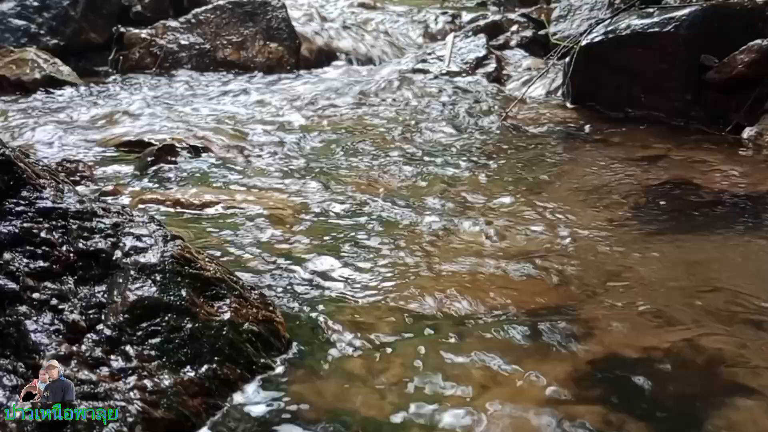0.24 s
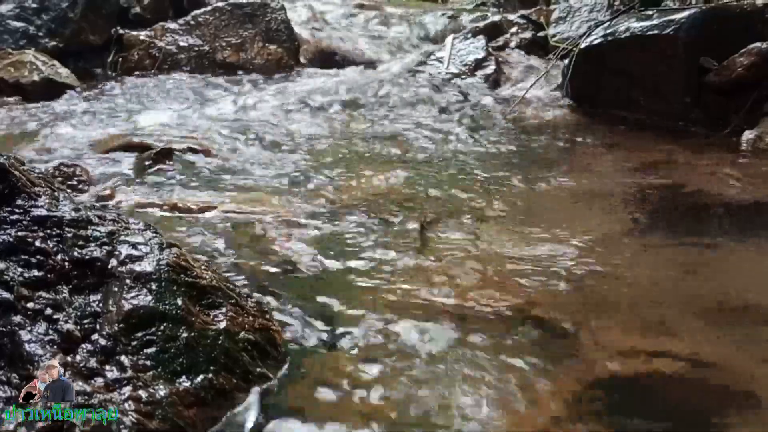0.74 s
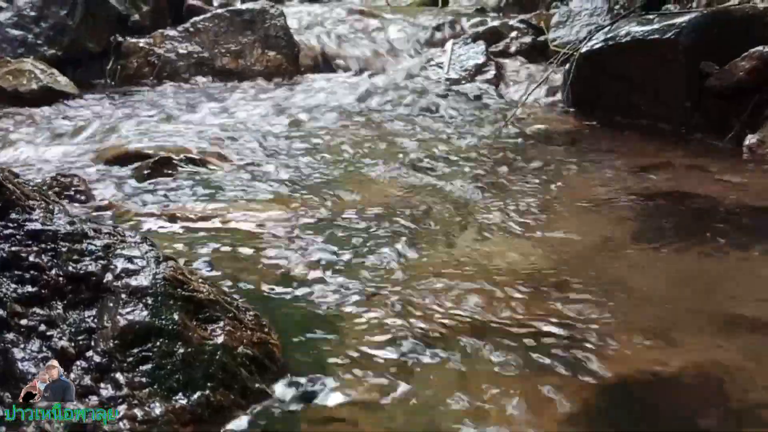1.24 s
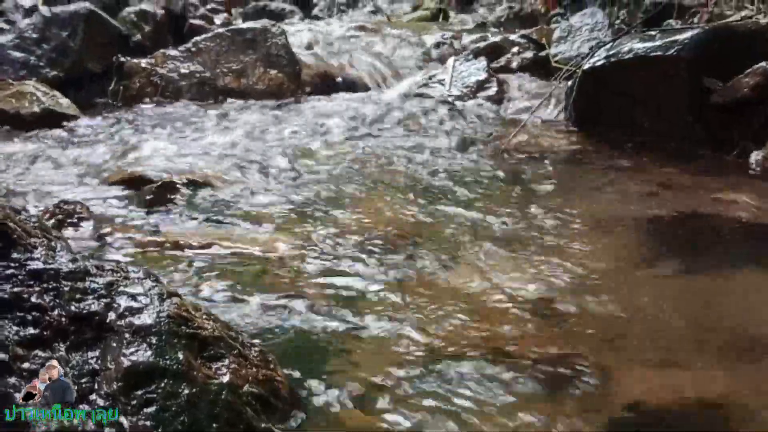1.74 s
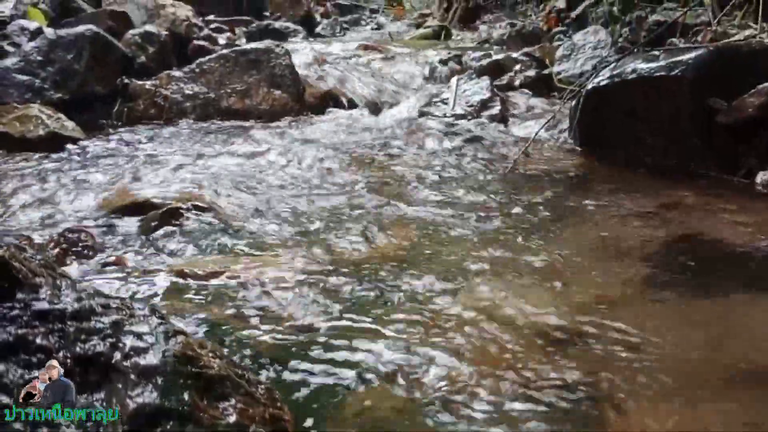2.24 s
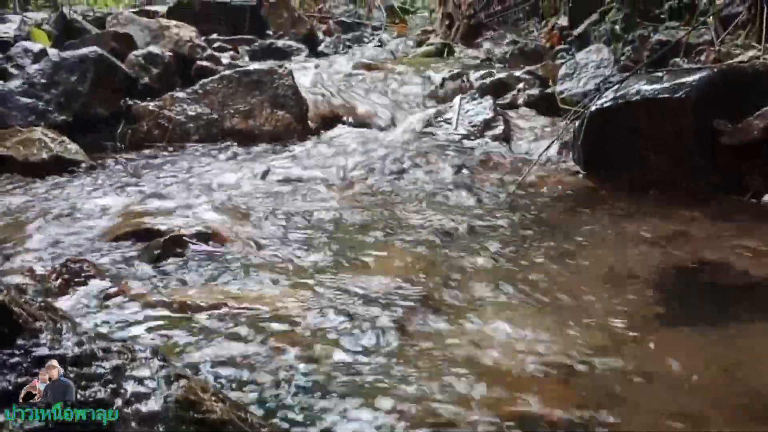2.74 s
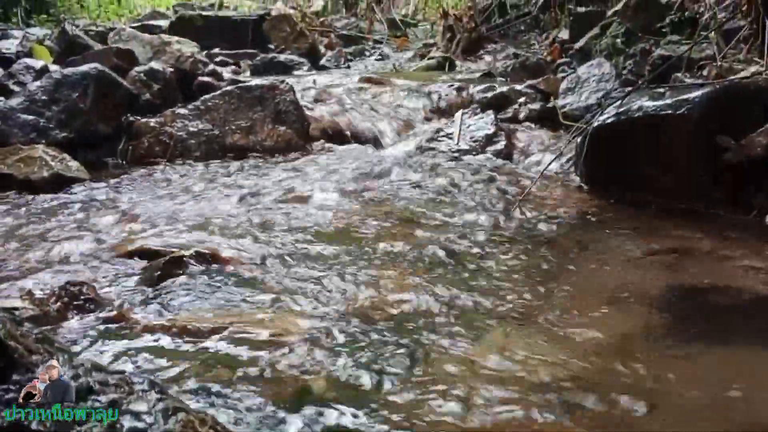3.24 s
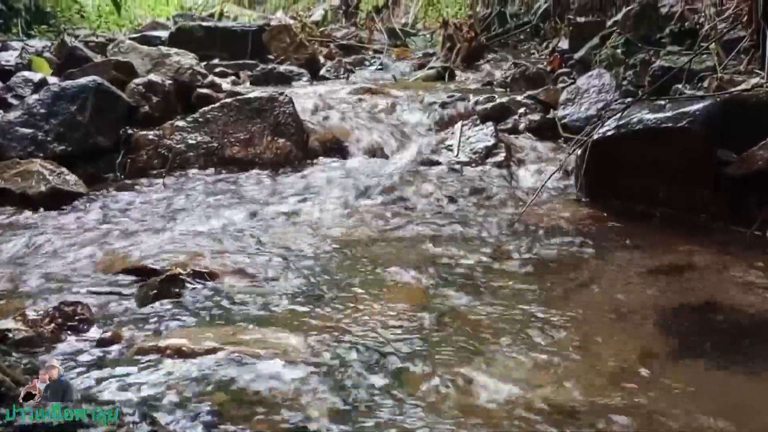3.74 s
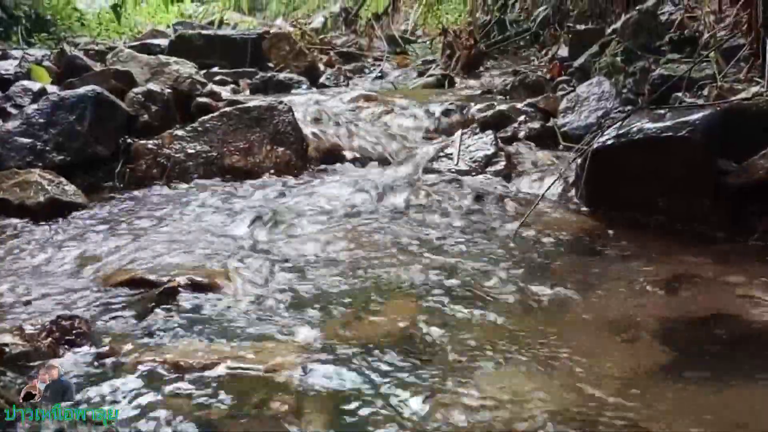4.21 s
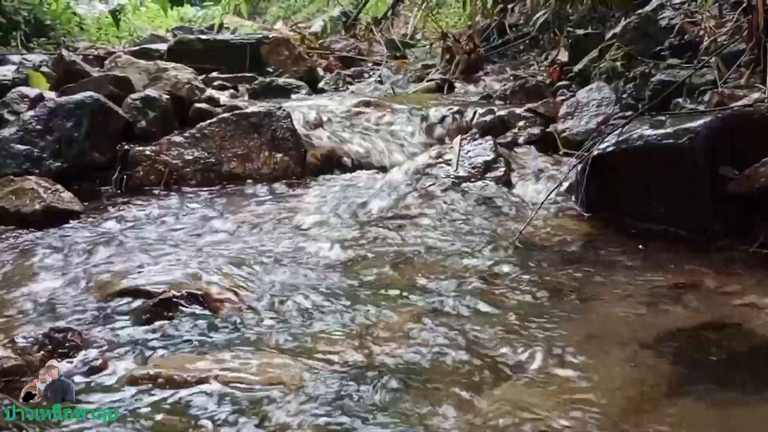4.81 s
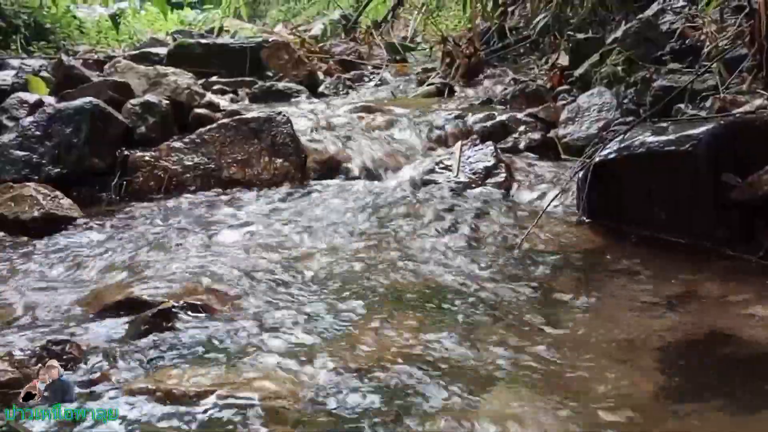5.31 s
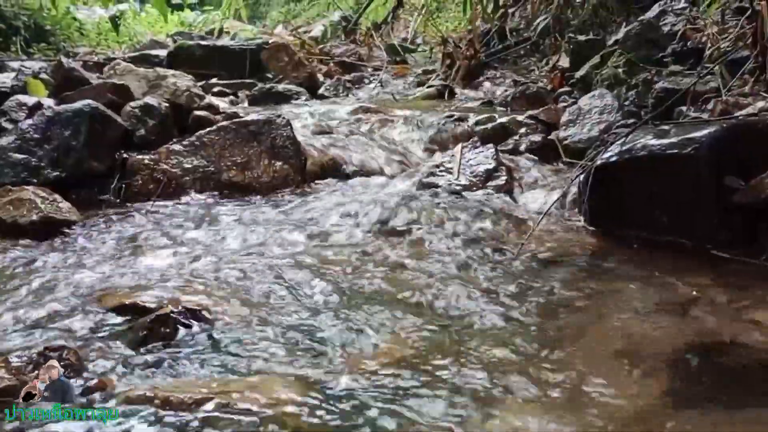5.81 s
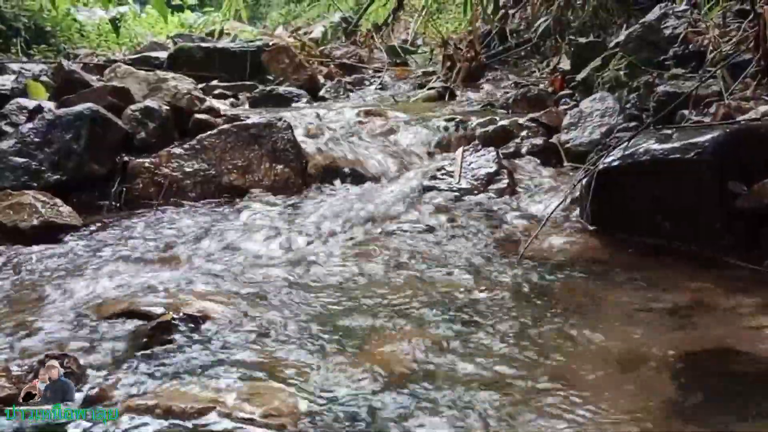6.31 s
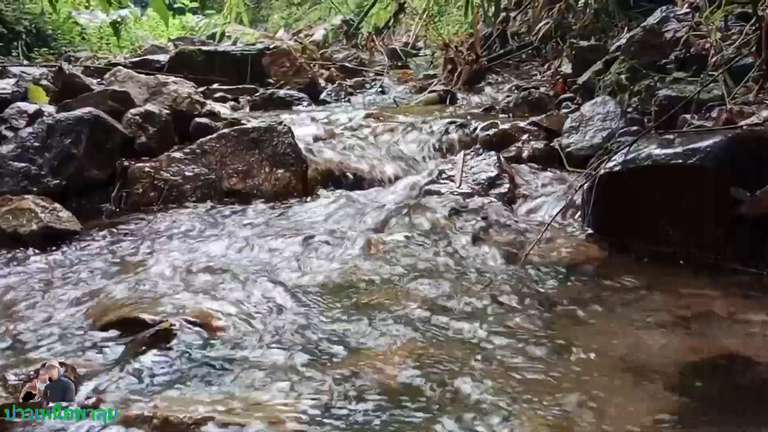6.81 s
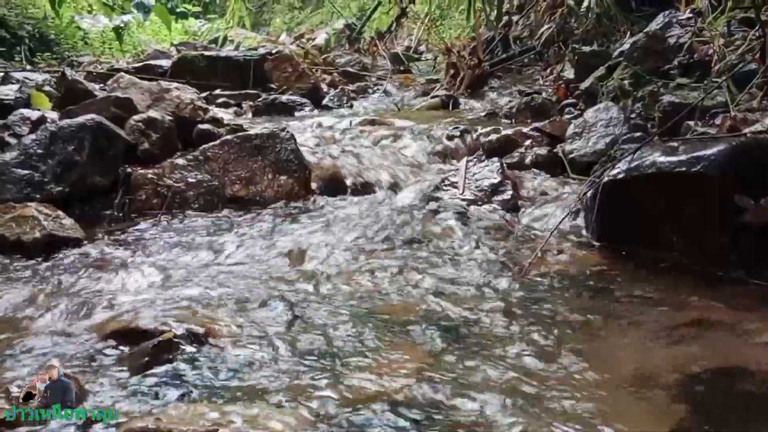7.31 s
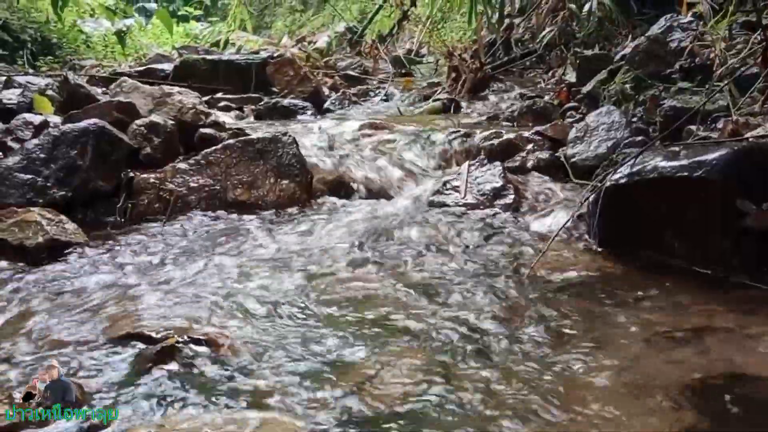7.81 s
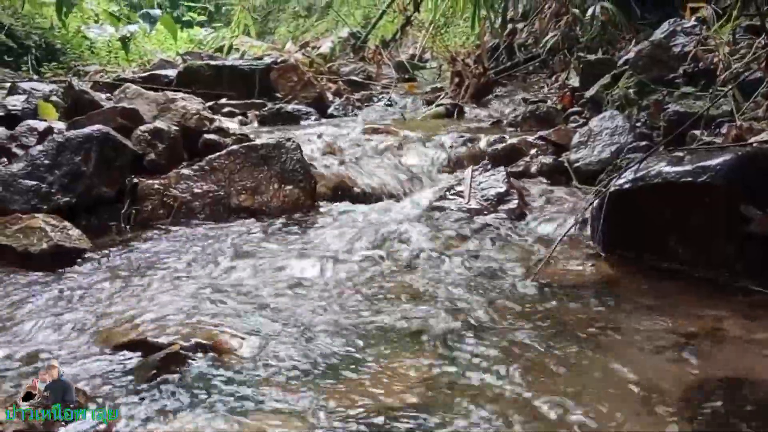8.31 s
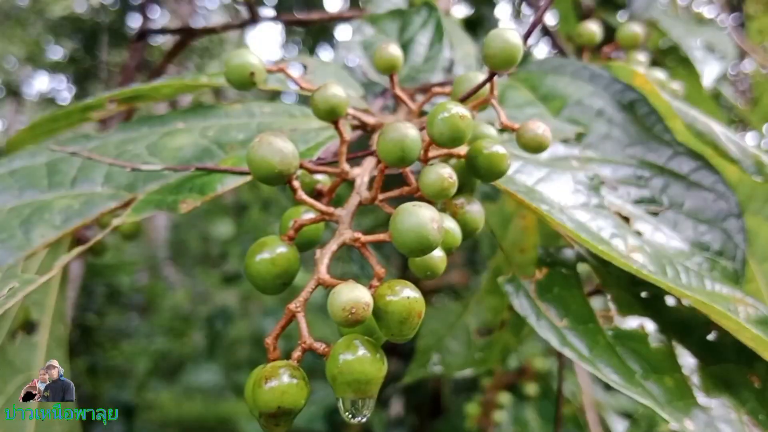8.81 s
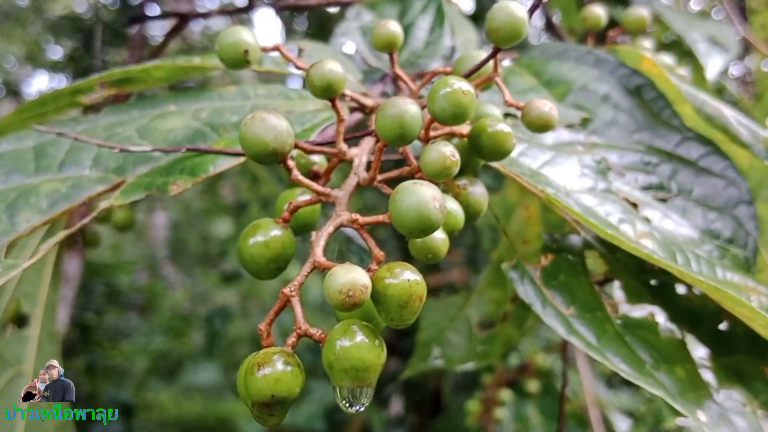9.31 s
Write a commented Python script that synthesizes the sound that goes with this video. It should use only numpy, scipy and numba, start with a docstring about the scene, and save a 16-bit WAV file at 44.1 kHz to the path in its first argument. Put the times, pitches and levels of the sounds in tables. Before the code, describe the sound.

A very short spell of quiet forest air with thin cicada and cricket tones opens the scene. After a tiny gap, a shallow stream swells in quickly, close to the microphone: dense bubbling, low gurgles, bright spray and plops over rocks. It runs continuously for about eight seconds, then cuts off to an even fainter forest with cicadas and one soft low bump.

```python
"""A shallow forest stream runs over rocks close by: decaying, rising sines make its bubbles and air pockets,
and coloured noise makes its wash, spray and splashes; wavelets set the bubbles off in bunches.
Before and after it come two short spells of quiet forest: faint air noise, a narrow noise band of cicadas,
amplitude-modulated tones of trilling crickets, far wavering notes and one soft bump of decaying noise."""
import sys
import numpy as np
from scipy import signal
from scipy.fft import rfft, irfft, next_fast_len
from scipy.io import wavfile
from scipy.ndimage import uniform_filter1d, minimum_filter1d
from numba import njit

SR = 44100
rng = np.random.default_rng(int(sys.argv[2]) if len(sys.argv) > 2 else 0)


def bounce(signal):
    """Save signal as a 16-bit WAV file at the path given by the first command-line argument."""
    frames = np.transpose(np.atleast_2d(signal))
    limited = np.clip(frames, -1, 1)
    pcm = np.round(limited * 32767).astype(np.int16)
    wavfile.write(sys.argv[1], SR, pcm)


N = 421155


def from_db(db):
    """Level to amplitude: 20 dB is a factor of ten."""
    return 10 ** (np.asarray(db) / 20)


def rms_one(x):
    """Normalization: scales the signal to unit root-mean-square amplitude."""
    return x / np.sqrt(np.mean(x ** 2) + 1e-20)


def gains(rows):
    """Level envelopes: each dB column becomes a gain per sample, silent outside the rows."""
    s, *columns = np.transpose(rows)
    t = np.arange(N) / SR
    return [from_db(np.interp(t, s, db, left=-np.inf, right=-np.inf)) for db in columns]


def drift(per_s):
    """Band-shaped random modulation: smooth, of unit spread, swinging about per_s times a second."""
    ratio = np.arange(N // 2 + 1) * SR / N / per_s
    shape = np.sqrt(ratio) / (1 + ratio ** 2)
    return rms_one(irfft(rfft(rng.standard_normal(N)) * shape, N))


def humps(rows, half_s):
    """Superposition of Gaussian bells in time, one for each row (time_s, height)."""
    t = np.arange(0, N, 64) / SR  # a coarse grid is enough for smooth bells
    bells = sum(height * np.exp(-((t - s) / half_s) ** 2) for s, height in rows)
    return np.interp(np.arange(N) / SR, t, bells)


def coloured(x, spectrum):
    """Minimum-phase (causal) filtering to the given spectrum, by way of the cepstrum; rms 1."""
    size = next_fast_len(N + SR // 2, True)
    hz, db = np.transpose(spectrum)
    grid = np.maximum(np.arange(size // 2 + 1) * SR / size, 1)
    magnitude = from_db(np.interp(np.log(grid), np.log(hz), db))
    cepstrum = irfft(np.log(magnitude), size)
    response = np.exp(rfft(2 * cepstrum[:size // 2], size))  # folding the cepstrum makes it causal
    return rms_one(irfft(rfft(x, size) * response, size)[:N])


def noise(spectrum):
    """Filtered noise: steady Gaussian noise with the given spectrum; rms 1."""
    return coloured(rng.standard_normal(N), spectrum)


def band(x, low_hz, high_hz):
    """Band-pass filtering with gentle Butterworth slopes."""
    return signal.sosfilt(signal.butter(2, [low_hz, high_hz], "band", fs=SR, output="sos"), x)


def strikes(rows):
    """Impulsive excitation: one click for each row (time_s, level_db, ..)."""
    s, db = np.transpose(rows)[:2]
    return np.bincount((s * SR).astype(int), from_db(db), N)


@njit
def ring_bubbles(start, height, hz, cycles, rise, swell):
    """Damped oscillators: each swells over `swell` cycles, dies 60 dB in `cycles`, glides up by share `rise`."""
    out = np.zeros(N)
    for k in range(len(start)):
        length = int(cycles[k] * SR / hz[k]) + 2
        fade = np.exp(-np.log(1000) / length)
        opening = np.exp(-hz[k] / (swell * SR))
        level, closed, phase = height[k], 1.0, 0.0
        for i in range(min(length, N - start[k])):
            out[start[k] + i] += level * (1 - closed) * np.sin(phase)
            phase += 2 * np.pi * hz[k] / SR * (1 + rise[k] * i / length)
            level *= fade
            closed *= opening
    return out


def swarm(per_s, low_hz, high_hz, cycles, rise, swell, size_db, surge):
    """Random births of damped bubbles, more in each surge; few are big, power is even over pitch; rms 1."""
    start = np.flatnonzero(rng.random(N) < per_s * surge / surge.mean() / SR)
    pitch, size, life, glide, sign = rng.random((len(start), 5)).T
    hz = low_hz + (high_hz - low_hz) * pitch
    loudness = from_db(size_db * np.minimum(-np.log(1 - size), 3.5))
    # high bubbles ring for less time, so they start stronger
    height = loudness * np.sqrt(hz) * np.sign(sign - .5)
    return rms_one(ring_bubbles(start, height, hz, cycles * (.5 + life), rise * glide, swell))


def single_bubbles(rows, cycles, rise, swell):
    """Damped oscillators at set times; each starts a little under its pitch, low ones die in fewer cycles."""
    s, db, hz = np.transpose(rows)
    life = cycles * (hz / np.median(hz)) ** 0.25 * rng.uniform(1.0, 1.92, len(s))
    start = (s * SR).astype(np.int64)
    return ring_bubbles(start, from_db(db), hz * (1 - rise / 6), life, np.full(len(s), rise), swell)


def splats(hits, t60):
    """Exponential energy decay: each hit on the surface is a burst of hiss that starts at once and dies."""
    power = signal.lfilter([1], [1, -from_db(-120 / (t60 * SR))], hits ** 2 + 1e-18)
    return np.sqrt(power) * rng.standard_normal(N)


def spatter(per_s, size_db, t60, surge):
    """Random impacts: droplets of uneven size fall back on the water in hiss bursts; rms 1."""
    lands = rng.random(N) < per_s * surge / surge.mean() / SR
    sizes = from_db(size_db * np.minimum(rng.exponential(1, N), 4))
    return rms_one(splats(lands * sizes, t60))


def among_rocks(x, echo_db, t60):
    """Diffuse scattering: stones and banks add a short dense decaying tail behind each sound."""
    t = np.arange(SR // 4) / SR
    tail = rng.standard_normal(len(t)) * from_db(-60 * t / t60) * (t > .002)
    return x + from_db(echo_db) * signal.fftconvolve(x, tail / np.linalg.norm(tail))[:N]


def crickets(count):
    """Amplitude modulation: a near cricket and farther ones trill out of step, pulses overlapping; rms 1."""
    centre_hz, spread_hz, pulse_hz = 5180, 30, 85
    t, out = np.arange(N) / SR, 0
    for k, (detune, pace) in enumerate(rng.uniform(-1, 1, (count, 2))):
        wing = np.sin(2 * np.pi * (centre_hz + spread_hz * detune) * t + .25 * drift(15.0))
        pulse_phase = 2 * np.pi * pulse_hz * (1 + 0.23 * pace) * t + .9 * drift(9)
        out = out + from_db(-10 * k) * wing * (1 + 0.48 * np.sin(pulse_phase))
    return rms_one(out)


def far_notes():
    """Frequency modulation: each faint note is a brief wavering tone in a Gaussian envelope."""
    # faint notes far off in the forest: time_s at the peak, peak_db, pitch_hz before the waver
    note_rows = [(0.17, -65, 1440), (9.09, -82, 890)]
    half_s, waver_share = 0.025, 0.029
    t = np.arange(N) / SR
    turns_s = np.cumsum(1 + waver_share * drift(70)) / SR
    out = np.zeros(N)
    for s, db, hz in note_rows:
        out += from_db(db) * np.exp(-((t - s) / half_s) ** 2) * np.sin(2 * np.pi * hz * turns_s)
    return out


def soft_bump():
    """Transient envelope: low noise with a linear attack and an exponential decay."""
    # colour of the bump: frequency_hz, density_db (relative, per Hz)
    bump_spectrum = [(60, -37), (160, 2), (250, -7), (340, -6), (510, -6), (680, -26), (2000, -42)]
    start_s, peak_db, attack_s, t60_s = 9.19, -60.5, .018, 0.25
    age = np.arange(N) / SR - start_s
    decay_db = peak_db - 60 * np.maximum(age - attack_s, 0) / t60_s
    return np.clip(age / attack_s, 0, 1) * from_db(decay_db) * noise(bump_spectrum)


def forest():
    """Superposed steady sources: air with an uneven low rustle, cicadas and crickets; notes and a bump join."""
    # levels of the quiet forest: time_s, air_db, cicadas_db, crickets_db
    forest_levels = [(0, -64, -61, -61), (.25, -64, -62, -63), (.292, -69, -69, -69),
                     (.3, -130, -130, -130), (8.8, -130, -130, -130), (8.86, -97, -88, -105),
                     (8.92, -86, -73, -100), (9.04, -82, -69, -81), (9.55, -82, -69.5, -76)]
    # forest air in the first and in the second spot: frequency_hz, density_db (relative, per Hz)
    air_first = [(40, -11), (140, -5.5), (900, -15.5), (1450, -8), (2200, -4.5), (4000, -23), (6000, -26),
                 (7800, -4.5), (9200, -18), (10000, -10.5), (11000, -19), (15500, -25)]
    air_second = [(40, 1), (170, 5), (600, -6), (1100, -5.5), (1600, 1.5), (4000, -12.5), (7300, -13.5),
                  (7900, 0), (10500, -3), (11600, -15.5), (15500, -24)]
    # cicada chorus: frequency_hz, density_db (relative, per Hz)
    cicada_spectrum = [(5500, -44), (6000, -30.5), (6300, -18), (6450, -18), (6700, -2.5), (7060, -3),
                       (7200, -21.5), (7500, -36)]
    air_gain, cicada_gain, cricket_gain = gains(forest_levels)
    t = np.arange(N) / SR
    air = np.where(t < t[-1] / 2, noise(air_first), noise(air_second))
    air = air + (from_db(2.5 * drift(14)) - 1) * band(air, 120, 700)
    insects = cicada_gain * noise(cicada_spectrum) + cricket_gain * crickets(count=3)
    return air_gain * air + insects + far_notes() + soft_bump()


def gulps(length_s, wobble):
    """Shape-modulated resonance: a trapped air pocket swells and fades, wobbling in pitch and strength."""
    # fullest gulps of air trapped under the rocks: time_s at the fullest, level_db (relative),
    # pitch_hz before the wobble
    gulp_rows = [(0.593, -43, 152), (1.09, -32.5, 367), (1.5, -45, 256), (1.58, -35, 347),
                 (1.812, -46, 206), (1.86, -35, 344), (2.336, -46, 156), (2.641, -34, 375),
                 (2.99, -44, 152), (3.084, -41, 228), (3.21, -35, 321), (3.661, -49, 155), (4.43, -37, 362),
                 (4.839, -46.5, 226), (5.381, -42, 284), (5.535, -36.5, 254), (5.665, -34.5, 348),
                 (5.7, -45, 136), (6.217, -41.5, 234), (6.435, -41, 216), (6.572, -45, 234),
                 (7.04, -38.5, 205), (8.338, -40, 195)]
    out, swell, shape = np.zeros(N), np.hanning(int(length_s * SR)), drift(12.3)
    for s, db, hz in gulp_rows:
        start = int((s - length_s / 2) * SR)
        span = slice(start, start + len(swell))
        phase = 2 * np.pi * np.cumsum(hz * (1 + wobble * shape[span])) / SR
        out[span] += from_db(db) * swell * np.sin(phase)
    return out * from_db(2 * drift(30))


def near_splashes():
    """Impulse and resonance: plops, slaps on stones, low clicks, drops that tap and leave a ringing bubble."""
    # loudest single bubbles: start_s, level_db (relative), pitch_hz (nominal)
    plop_rows = [(0.8, -15.5, 772), (0.82, -6.5, 830), (0.822, -4, 605), (0.903, -14, 2078),
                 (0.961, -9.5, 843), (1.018, -10.5, 830), (1.053, -6, 2100), (1.08, -7.5, 436),
                 (1.131, -6.5, 1280), (1.235, -1.5, 1195), (1.256, -3, 537), (1.287, -6, 1310),
                 (1.309, -2.5, 786), (1.418, -8.5, 1200), (1.533, 4, 1207), (1.728, -5.5, 1220),
                 (1.776, -10, 1250), (1.85, -11.5, 767), (1.994, -8.5, 1220), (2.218, -8.5, 460),
                 (2.393, -13, 590), (2.411, -4.5, 1480), (2.427, -9.5, 471), (2.656, -7, 1220),
                 (2.772, -10, 1800), (2.779, -5, 1506), (3.168, -0.5, 1320), (3.189, -5, 1580),
                 (3.212, -7, 620), (3.217, -7, 1070), (3.671, -2, 1200), (3.725, -10, 1370),
                 (3.766, -8, 510), (3.911, -12, 846), (3.915, -9.5, 508), (4.064, -6, 800),
                 (4.218, -6, 526), (4.41, -9, 1680), (4.44, -9.5, 2300), (4.535, -11.5, 584),
                 (4.677, -11, 567), (4.713, -5.5, 598), (4.771, -14, 1230), (4.788, -7.5, 513),
                 (4.817, -4.5, 1203), (4.853, -10, 626), (5.128, -6.5, 1920), (5.35, -2.5, 1270),
                 (5.475, -5, 793), (5.656, -1, 1585), (5.696, -9, 1030), (5.779, -8, 1044),
                 (5.893, -4, 550), (5.912, -12.5, 440), (6.034, -11, 530), (6.238, -3.5, 1900),
                 (6.325, -10, 1210), (7.401, -8, 1940), (7.43, -10, 591), (7.733, -7, 575),
                 (7.808, -8, 1580), (7.872, -8.5, 1920), (7.938, -10.5, 2077), (8.167, -4, 595),
                 (8.217, -7, 1090), (8.325, -5, 1980), (8.44, -1.5, 1610), (8.466, -4, 618),
                 (8.472, -6, 844), (8.595, 3, 1197), (8.616, -10, 2000)]
    # loudest drops landing close by: start_s, level_db (relative), pitch_hz (nominal)
    drop_rows = [(0.7528, -17.5, 8100), (1.3155, -11.5, 8540), (1.8503, -10, 8000), (2.5367, -16, 8200),
                 (3.073, -16.5, 8870), (3.5015, -15, 8500), (4.592, -16.5, 6440), (4.8524, -8.5, 8360),
                 (4.9193, -15, 8330), (5.7339, -12, 8650), (5.8921, -16, 8700), (6.0343, -16, 9600),
                 (6.4852, -13.5, 7650), (7.037, -16.5, 5510)]
    # wavelets slapping a stone: start_s, level_db (relative)
    slap_rows = [(0.8, -31), (1.277, -27), (1.637, -29.5), (1.774, -32), (2.769, -28.5), (3.212, -26.5),
                 (4.106, -24.5), (4.591, -29.5), (4.851, -26), (5.654, -31), (5.78, -20), (5.798, -28),
                 (5.893, -18.5), (7.037, -23.5), (7.401, -23)]
    # short low broadband clicks: start_s, level_db (relative)
    low_click_rows = [(1.257, -5), (3.214, -6), (5.656, -15), (7.039, -16)]
    plops = band(single_bubbles(plop_rows, cycles=22.2, rise=0.16, swell=2.37), 380, 6000)
    # the surface breaks with each plop
    bursts = band(splats(strikes(plop_rows), t60=0.037), 430, 2600)
    slap = splats(strikes(slap_rows), t60=0.025)
    slaps = from_db(13) * band(band(slap, 380, 3700), 380, 3700)  # twice for steeper edges
    low_clicks = band(strikes(low_click_rows), 25, 260)  # band-passed impulses
    taps = band(splats(strikes(drop_rows), t60=0.028), 2900, 12000)
    drops = single_bubbles(drop_rows, cycles=46, rise=0.0594, swell=3.2) + from_db(-12.0) * taps
    return from_db(1.2) * plops + from_db(-16) * bursts + slaps + low_clicks + from_db(1.0) * drops


def spray_layer(wavelets, wash, splashing):
    """High-frequency bubble resonance and impact noise: fizz, splashing, ticks and pings; rms 1."""
    # colour of the spray: frequency_hz, density_db (relative, per Hz)
    spray_spectrum = [(3000, -35.5), (5400, -6.5), (6050, -9.5), (6800, -0.5), (7900, 2), (8750, 2.5),
                      (9350, -7), (9850, -3.5), (11400, -10), (12000, -11), (13100, -7), (13850, -15.5),
                      (15300, -11.5), (17000, -22.5)]
    fizz = swarm(2400, 4610, 15800, cycles=170, rise=0.11, swell=0.15, size_db=3.5,
                 surge=from_db(1.6 * wavelets))
    # the nearest droplets tick sharply, and a few trap a tiny bubble that pings
    ticks = spatter(50, size_db=3.9, t60=.015, surge=from_db(2 * wavelets + 3 * drift(7)))
    pings = swarm(45, 6500, 10000, cycles=130, rise=0.073, swell=.5, size_db=5.5,
                  surge=from_db(2 * wavelets))
    droplets = from_db(2.5) * splashing + from_db(0.5) * ticks + from_db(-10.0) * pings
    return coloured(fizz + wash + droplets, spray_spectrum)


def babble_layer(wavelets, wash, splashing):
    """Small-bubble resonance over wash and splashing; rms 1 before one band is modulated in level."""
    # colour of the babble: frequency_hz, density_db (relative, per Hz)
    babble_spectrum = [(500, -39), (900, -9), (1070, -2), (1240, -1.5), (1380, -5.5), (1530, -3.5),
                       (1740, -7), (1920, -4.5), (2250, -9), (2390, -7.5), (2900, -15.5), (3650, -25.5),
                       (4400, -27.5), (6000, -54.5)]
    small = swarm(1600, 901.8, 4630, cycles=95.4, rise=0.22, swell=0.016, size_db=0.96,
                  surge=from_db(2.4 * wavelets))
    babble = coloured(small + from_db(-1) * wash + from_db(-8) * splashing, babble_spectrum)
    # random slow level modulation of the 3.1 to 5.2 kHz band
    return babble + (from_db(2.8 * drift(5.0)) - 1) * band(babble, 3100, 5200)


def gurgle_layer(wavelets, wash):
    """Large-bubble resonance: big and deep bubbles and slow pockets; rms 1 before the low levels are shaped."""
    # colour of the gurgle: frequency_hz, density_db (relative, per Hz)
    gurgle_spectrum = [(30, -54.5), (100, -30), (145, -26), (175, -27), (230, -26.5), (285, -31.5),
                       (350, -16), (390, -18), (450, -5.5), (605, 4), (700, -1), (800, 4.5), (930, -2.5),
                       (1300, -26.5)]
    # lowest gurgling: time_s, level_db over its usual level
    low_levels = [(0.6, 2), (3.7, 0.5), (4.2, -4.5), (4.7, -1), (5.6, 2.5), (6.3, -0.5), (7.1, 1),
                  (7.85, -4.5), (8.3, 1)]
    big = swarm(420, 330, 1005.0, cycles=42.0, rise=0.33, swell=0.8, size_db=2.5,
                surge=from_db(2.2 * wavelets + 1.2 * drift(12)))
    # the deepest bubbles murmur in patches of their own
    deep = swarm(130, 110, 340, cycles=23.4, rise=.25, swell=1.2, size_db=3.5,
                 surge=from_db(1.5 * wavelets + 4 * drift(6)))
    # slow air pockets sing round, rising notes
    pockets = swarm(30, 140, 521, cycles=34, rise=0.2, swell=11, size_db=1.5, surge=from_db(wavelets))
    bubbles = big + from_db(-2.0) * deep + from_db(-12) * pockets
    gurgle = coloured(bubbles + from_db(-4) * wash, gurgle_spectrum)
    low_gain = from_db(np.interp(np.arange(N) / SR, *np.transpose(low_levels)))
    return gurgle + (low_gain - 1) * band(gurgle, 70, 550)


def stream():
    """Superposition of gurgle, babble and spray, all modulated by the same wavelets, current, waves and lulls."""
    # strength of the current: time_s, level_db over its usual level
    current_rows = [(0.6, 0.5), (0.9, 4.5), (1.3, 2.5), (1.55, 1.15), (2.35, 0.8), (3.4, 0), (4.8, 0.5),
                    (6.4, 0.5), (6.9, -0.5), (7.8, 2), (8.6, 0.6)]
    # bigger waves pour over the stones: time_s at the crest, gurgle_db added, babble_db added
    wave_rows = [(0.59, 1.5, 1.5), (0.68, 3.5, 1.5), (1.28, 3, -1.5), (1.8, 3.5, 3), (2.38, 4.5, 3),
                 (3.2, 4, 0), (3.8, 5, -1), (4.24, 3, -0.5), (4.79, 8.5, 2), (5.65, 2.5, 2.5),
                 (5.91, 6, -1.5), (6.36, 1.5, 2), (6.46, 3, 3), (6.91, 1, 3.5), (7.42, 1.5, -0.5),
                 (8.32, 4.5, 1), (8.47, 7, 1)]
    # the water slackens between waves: time_s at the trough, loss_db
    lull_rows = [(0.785, 0), (1.39, 0.5), (1.61, 3), (2.52, 4.5), (3.258, 2.5), (3.62, 1), (4.16, 2.5),
                 (4.57, 3.5), (5.29, 2.5), (5.45, 1.5), (5.83, 3), (6.08, 3.5), (6.56, 2), (6.84, 2),
                 (6.995, 2.5), (8.11, -1)]
    wave_half_s, lull_half_s = 0.038, 0.022
    t = np.arange(N) / SR
    wavelets = drift(24)
    wash = from_db(-9) * rng.standard_normal(N)  # smooth wash of the rapids
    splashing = spatter(150, size_db=1.0, t60=0.19, surge=from_db(3.1 * wavelets))

    current_db = np.interp(t, *np.transpose(current_rows))
    lulls_db = humps(lull_rows, lull_half_s)
    gurgle_waves_db = humps([(s, db) for s, db, _ in wave_rows], wave_half_s)
    babble_waves_db = humps([(s, db) for s, _, db in wave_rows], wave_half_s)
    gurgle_swing_db = gurgle_waves_db - 1.3 * lulls_db  # lulls weigh more on the gurgle
    babble_swing_db = babble_waves_db - lulls_db
    # the gurgling slowly recedes, by 0.49 dB per second
    gurgle_db = -28.5 + 0.82 * current_db - 0.49 * t + gurgle_swing_db
    babble_db = -25.5 + current_db + babble_swing_db
    spray_db = -36 + 0.74 * current_db + .4 * babble_swing_db

    gurgle = from_db(gurgle_db) * gurgle_layer(wavelets, wash)
    babble = from_db(babble_db) * babble_layer(wavelets, wash, splashing)
    spray = from_db(spray_db) * spray_layer(wavelets, wash, splashing)
    return gurgle + babble + spray


def stream_fade():
    """Amplitude envelope: the stream fades in quickly; at the end it dips and is cut off."""
    start_s, end_s = 0.415, 8.69
    fade_in_s, fade_out_s, fade_out_db = 0.047, 0.047, 12.5  # fade_in_s is a time constant
    t = np.arange(N) / SR
    opening = (1 - np.exp(-np.maximum(t - start_s, 0) / fade_in_s)) ** 2
    closing = from_db(-fade_out_db * np.clip(1 - (end_s - t) / fade_out_s, 0, 1))
    return opening * closing * np.clip((end_s - t) / .005, 0, 1)


def scene():
    """Superposition: the open stream, with the quiet forest before and after."""
    close = among_rocks(near_splashes(), echo_db=-11.0, t60=0.28)
    water = stream() + close + from_db(0.5) * gulps(length_s=0.11, wobble=0.079)
    return (water * stream_fade() + forest())[None]


def limited(x, ceiling):
    """Peak limiting: a fast, smoothed gain ducks the few peaks that pass the ceiling."""
    size = SR // 200
    needed = ceiling / np.maximum(np.abs(x), ceiling)
    return x * uniform_filter1d(minimum_filter1d(needed, size), size)


def record(dry):
    """Band rejection: the microphone has a treble notch, and the notch's depth wavers; peaks are limited, the
    top is cut."""
    notch_hz, notch_width_hz, cutoff_hz = 4850, 1050, 15600
    depth_db, waver_db = -25, 8.5
    edges = notch_hz + notch_width_hz * np.array([-.5, .5])
    notched = signal.sosfilt(signal.butter(2, edges, "bandstop", fs=SR, output="sos"), dry)
    leak = from_db(np.minimum(depth_db + waver_db * drift(3), 0))
    notched = notched + leak * (dry - notched)
    low_pass = signal.ellip(10, .2, 80, cutoff_hz, fs=SR, output="sos")
    return signal.sosfilt(low_pass, limited(notched, ceiling=.49))


dry = scene()
out = record(dry)
bounce(out)
```